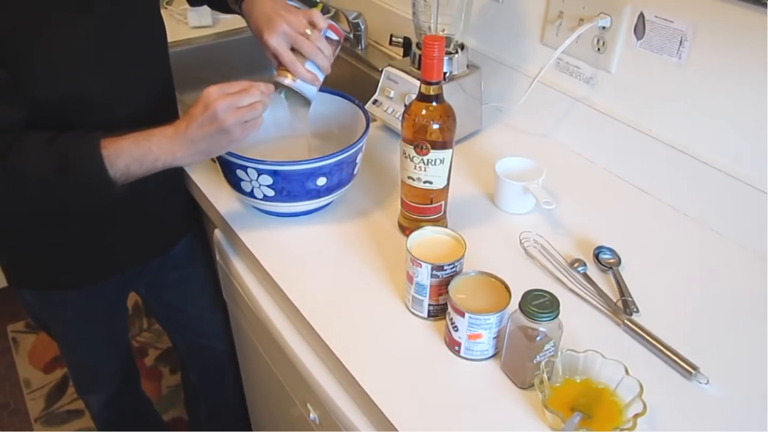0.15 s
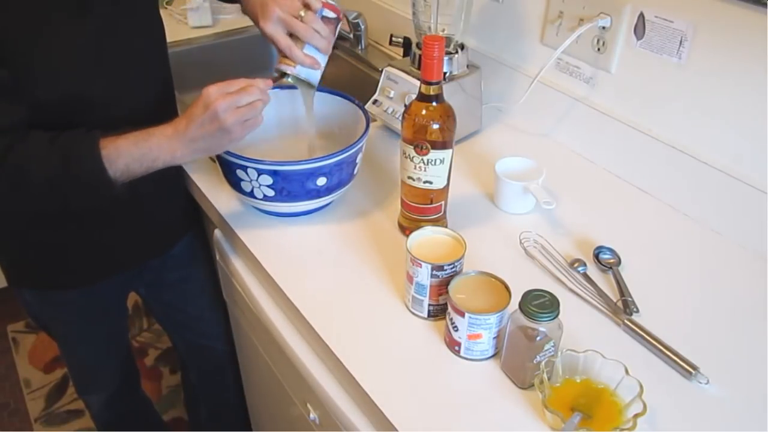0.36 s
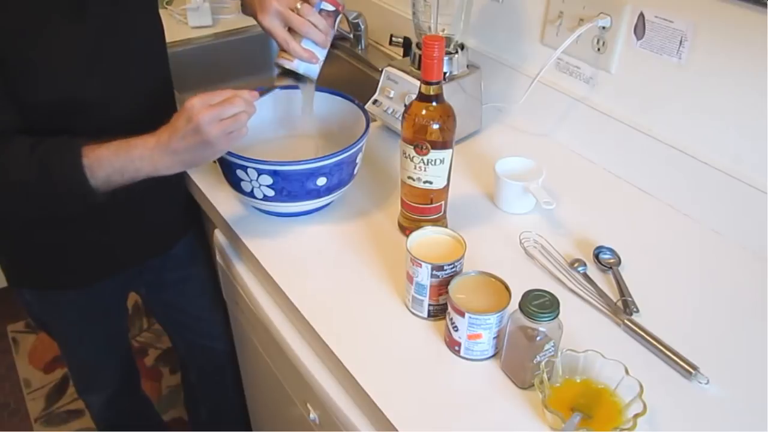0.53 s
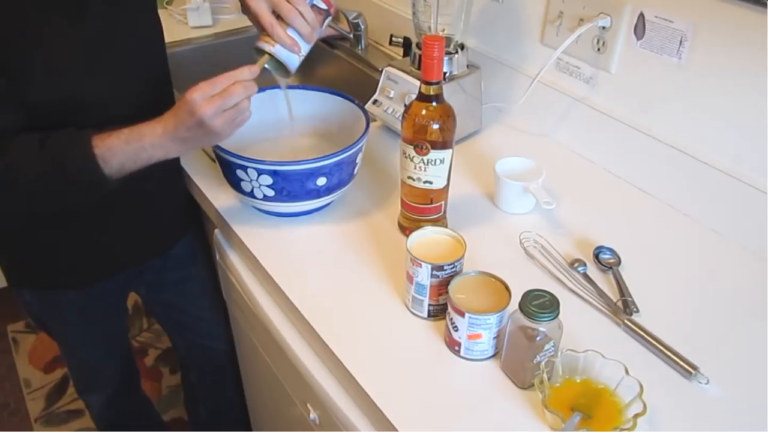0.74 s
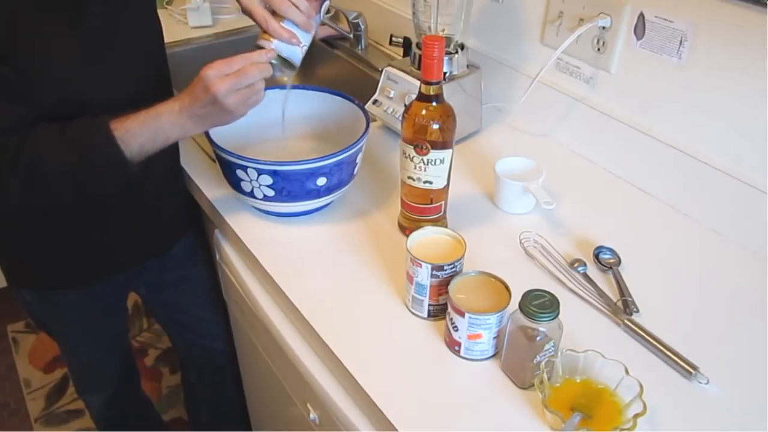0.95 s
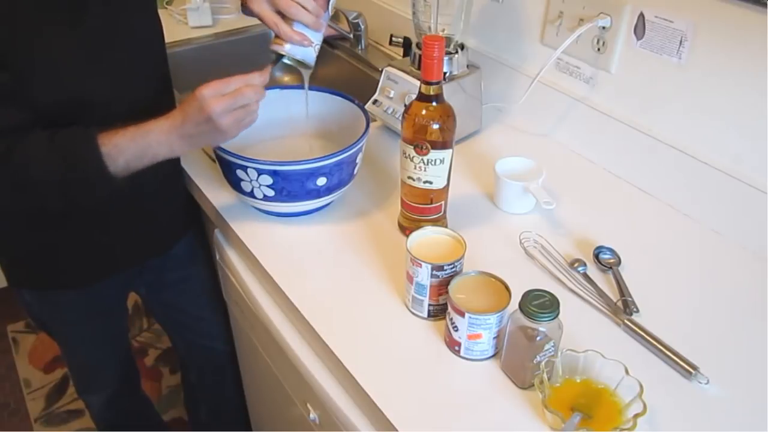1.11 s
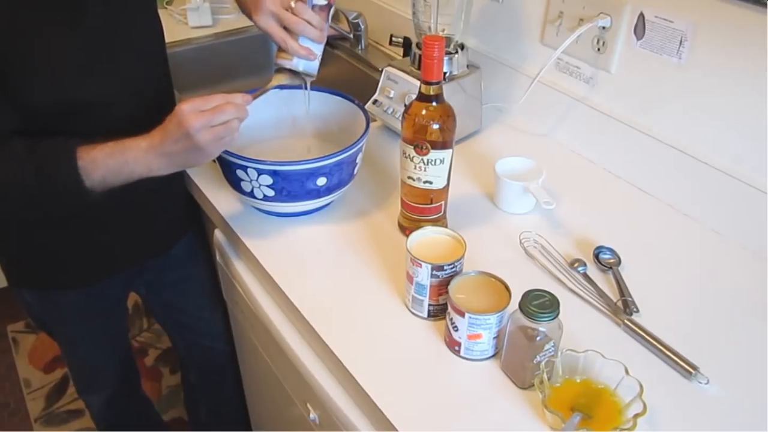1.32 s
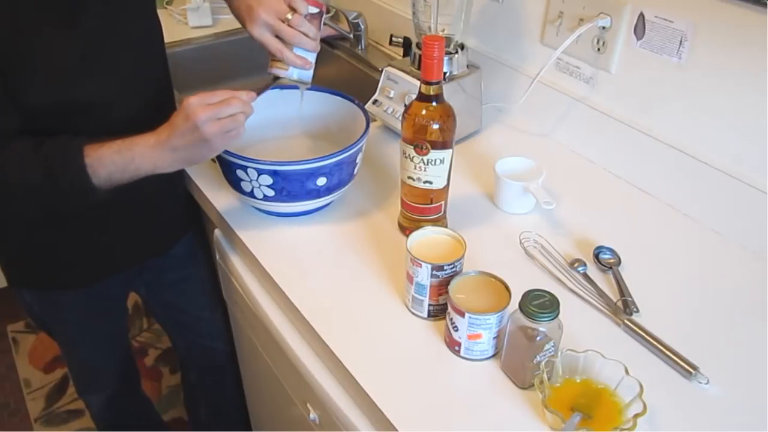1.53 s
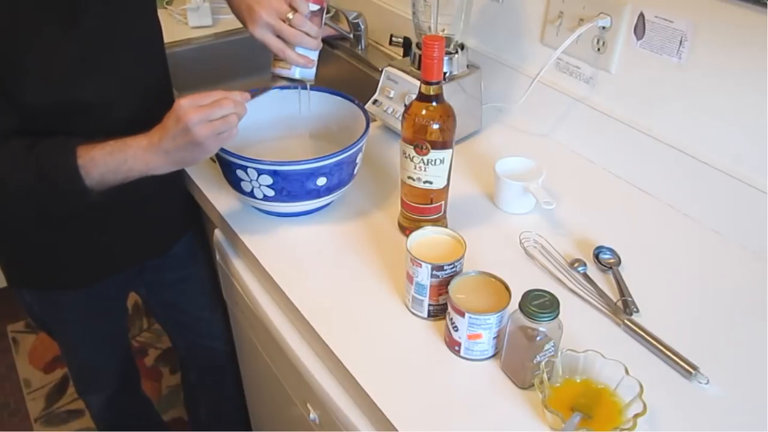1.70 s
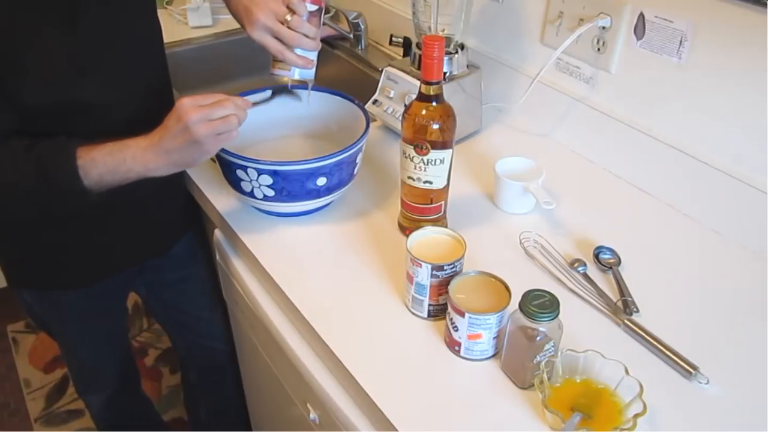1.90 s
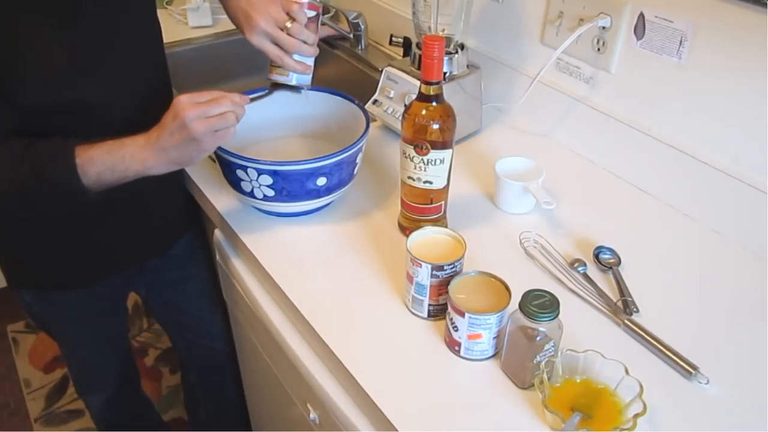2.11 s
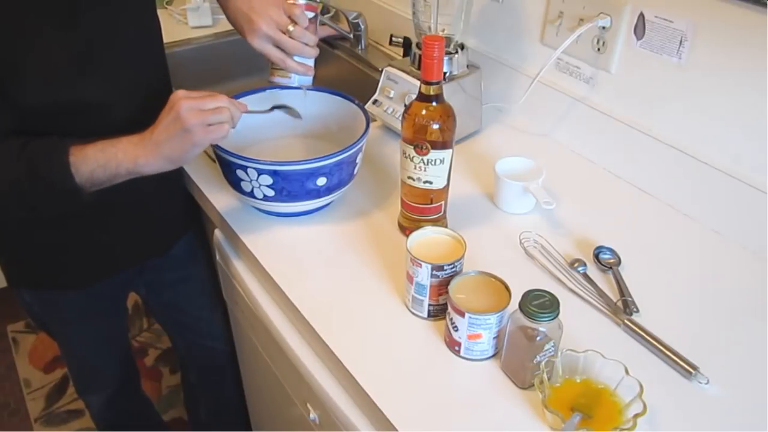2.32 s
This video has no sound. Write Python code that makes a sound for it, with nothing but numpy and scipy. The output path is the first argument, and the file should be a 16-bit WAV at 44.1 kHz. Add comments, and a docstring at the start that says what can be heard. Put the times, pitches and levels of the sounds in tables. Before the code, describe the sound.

Spoon scraping out a can of thick cream: quick rasps and taps first, soft plops, a brief metallic squeal, then louder tinny clanks with short scrapes, over faint room hum and slight kitchen reverberation.

```python
"""A small kitchen hums faintly, with a thin whine, while a metal spoon empties a hand-held can of thick cream.
First comes a flurry of scrapes and light knocks: stick-slip pulses and noise bursts through the can's resonances.
Around it the cream crackles, plops and drops into a ceramic bowl, as short noise bursts and decaying sines.
Then a drag along the wall sings as an unsteady sine, and harder knocks ring panel, rim and booming bottom.
A few scrapes join those knocks; one last small crackle follows them."""
import sys
import numpy as np
from scipy import signal
from scipy.fft import rfft, irfft
from scipy.io import wavfile

SR = 44100
rng = np.random.default_rng(int(sys.argv[2]) if len(sys.argv) > 2 else 0)


def materialize(psi):
    """Save the field psi as 16-bit PCM at rate SR to the path in sys.argv[1].

    A 1-D psi becomes a single channel; in a 2-D psi each row is a channel.
    """
    bounded = np.clip(np.atleast_2d(psi).T, -1, 1)
    quanta = np.round(bounded * 32767).astype(np.int16)
    wavfile.write(sys.argv[1], SR, quanta)


N = 103635
T = np.arange(N) / SR
SHORT = T[:SR // 4]  # time axis of a single event [s]
BOTTOM_RISE_S, BOTTOM_SAG_S = 0.0036, 0.021


def undb(db):
    """Decibels to gain."""
    return 10 ** (np.asarray(db) / 20)


def unit(x):
    """Scale to rms 1."""
    return x / np.sqrt(np.mean(np.abs(x) ** 2))


def add(out, start, x):
    """Mix x into out at a time in seconds."""
    i = max(int(start * SR), 0)
    out[i:i + len(x)] += x[:N - i]


def fade(t, t60):
    """Exponential decay, down 60 dB after t60 seconds."""
    return np.exp(-np.log(1000) * t / t60)


def noise(t):
    """White noise as long as t."""
    return rng.standard_normal(len(t))


def band(x, hz, width):
    """One resonance, gain 1 at its centre."""
    return signal.lfilter(*signal.iirpeak(hz, hz / width, fs=SR), x)


def butter(x, order, hz, kind):
    """Butterworth filter with a flat passband."""
    return signal.sosfilt(signal.butter(order, hz, kind, fs=SR, output="sos"), x)


def colour(x, points):
    """Minimum-phase filter through (frequency [Hz], gain [dB]) points, built by folding the cepstrum."""
    size = 2048
    hz, db = np.array(points).T
    f = np.maximum(np.arange(size // 2 + 1) * SR / size, 1)
    gain = undb(np.interp(np.log(f), np.log(hz), db))
    cepstrum = irfft(np.log(gain))
    cepstrum[1:size // 2] *= 2
    cepstrum[size // 2 + 1:] = 0
    impulse = irfft(np.exp(rfft(cepstrum)))
    return signal.fftconvolve(x, impulse)[:len(x)]


def ring(hz, t60, rise, sag=0):
    """A mode that swells briefly and dies away, starting sharp by the share sag; rms 1 at its peak."""
    env = (1 - np.exp(-(SHORT / rise) ** 2)) * fade(SHORT, t60)
    pitch = hz * (1 + sag * np.exp(-SHORT / BOTTOM_SAG_S))
    return np.sqrt(2) * env / env.max() * np.sin(2 * np.pi * np.cumsum(pitch) / SR)


def burst(hz, width, t60):
    """A dying burst of noise around one frequency, scaled by the spread of its undamped noise."""
    grains = noise(SHORT)
    steady = band(band(grains, hz, width), hz, width)
    dying = band(band(grains * fade(SHORT, t60), hz, width), hz, width)
    return dying / np.std(steady)


# spectral shape of the room noise: (frequency [Hz], relative level [dB])
NOISE_SHAPE = [(15, -8.5), (25, -13), (44, -16.5), (221, -13), (260, -16), (305, -17), (722, -25),
               (1020, -23), (6730, -34), (7910, -32), (15500, -46)]
NOISE_DB = -55  # rms level of the room noise
# steady hum and whine: (frequency [Hz], rms level [dB])
HUM_AND_WHINE = [(312, -70.5), (1023, -73), (7854, -69.5), (7881, -82.5)]


def background():
    """Soft shaped noise plus steady sines: a faint hum and a thin whine whose close partials beat."""
    out = undb(NOISE_DB) * unit(colour(noise(T), NOISE_SHAPE))
    for hz, db in HUM_AND_WHINE:
        out += undb(db) * np.sqrt(2) * np.sin(2 * np.pi * (hz * T + rng.random()))
    return out


# low resonances of the kitchen: (frequency [Hz], width [Hz], gain over the direct sound [dB])
ROOM_MODES = [(355, 16, -2), (399.2, 9.4, 9), (458, 20, -5.5), (490, 3.1, -4), (537, 30, -1.5),
              (621, 8.2, 1)]
ROOM_T60_S, ROOM_TREBLE_T60_S, ROOM_DELAY_S = 0.35, 0.2, 0.0086
ROOM_DB, ROOM_BASS_DB = -6, -7.5  # reflection gains


def kitchen(x):
    """Diffuse reflections as decaying noise, shorter in the treble, and a few low room resonances."""
    t = T[:SR // 2]
    tail = np.zeros(len(t))
    for edges, t60, db in [((100, 700), ROOM_T60_S, ROOM_BASS_DB), ((700, 6500), ROOM_T60_S, ROOM_DB),
                           ((6500, 17000), ROOM_TREBLE_T60_S, ROOM_DB)]:
        env = fade(t, t60) * (t > ROOM_DELAY_S)
        reflections = noise(t) * env / np.linalg.norm(env)
        tail += undb(db) * butter(reflections, 3, edges, "band")
    modes = sum(undb(db) * band(band(x, hz, 6 * width), hz, width) for hz, width, db in ROOM_MODES)
    return x + signal.fftconvolve(x, tail)[:N] + modes


# sticky cream parting from metal: (time [s], level [dB], centre [Hz], width [Hz])
CRACKLES = [(0.055, -34.5, 5000, 1310), (0.061, -43, 8600, 8000), (0.6275, -46, 5500, 5560),
            (0.641, -48.5, 9400, 6000), (0.7117, -39.5, 7400, 6900), (0.9434, -36.5, 9700, 6040),
            (1.4168, -33, 5560, 8600), (2.133, -56, 12300, 4000)]
# plops in the cream, and at 0.505 s a short ring of the can's rim:
# (time [s], level before the tone/noise blend [dB], pitch [Hz], t60 [s])
PLOPS_AND_RIM = [(0.383, -27.5, 1095, 0.056), (0.394, -35, 960, .05), (0.417, -27, 1460, 0.091),
                 (0.505, -29, 1966, 0.073), (1.4152, -19, 1713, 0.019), (1.423, -28.5, 1424, 0.06)]
# lumps of cream landing in the bowl: (time [s], level [dB], centre [Hz], t60 [s])
LUMPS = [(0.426, -50, 156, 0.16), (0.708, -47.5, 104, 0.27), (1.42, -44, 157, 0.26)]


def cream(crackle_t60=0.047, plop_rise=0.0015, plop_width_hz=260, lump_width_hz=110):
    """Wet noise crackles, ragged decaying plops, one short rim ring made alike, and soft thuds of lumps."""
    out = np.zeros(N)
    for s, db, hz, width in CRACKLES:
        add(out, s, undb(db) * burst(hz, width, crackle_t60))
    for s, db, hz, t60 in PLOPS_AND_RIM:
        ragged_tone = 0.5 * ring(hz, t60, plop_rise) + 0.72 * burst(hz, plop_width_hz, t60)
        add(out, s, undb(db) * ragged_tone)
    for s, db, hz, t60 in LUMPS:
        add(out, s, undb(db) * burst(hz, lump_width_hz, t60))
    return out


# the spoon's edge singing along the wall, before wander and flutter: (time [s], pitch [Hz], peak level [dB])
SQUEAL = [(0.86, 2560, -71), (0.90, 2590, -45.5), (0.951, 2543, -58), (1.021, 2685, -52), (1.07, 2720, -39),
          (1.12, 2734, -45.5), (1.2, 2650, -38)]
SQUEAL_WANDER_HZ, SQUEAL_FLUTTER_DB, SQUEAL_FLUTTER_RATE_HZ = 30, 2.5, 45  # rms depths, centre rate


def squeal():
    """The spoon's edge sings as one sine, its pitch and level shaken by low-frequency noise."""
    times, hz, db = np.array(SQUEAL).T
    wander, flutter = (unit(band(noise(T), SQUEAL_FLUTTER_RATE_HZ, 2 * SQUEAL_FLUTTER_RATE_HZ))
                       for _ in range(2))
    pitch = np.interp(T, times, hz) + SQUEAL_WANDER_HZ * wander
    level_db = np.interp(T, times, db, left=-np.inf, right=-np.inf) + SQUEAL_FLUTTER_DB * flutter
    return undb(level_db) * np.sin(2 * np.pi * np.cumsum(pitch) / SR)


# side panel and rim, broadly higher as the cream runs out: (time [s], panel pitch [Hz], rim pitch [Hz])
CAN_PITCH = [(0.2, 791, 1845), (0.5, 796.5, 1910), (0.9, 841, 1850), (1.37, 856, 1976), (1.8, 873, 1995)]


def can_pitch(s):
    """Panel and rim frequencies at a time, between the table's points."""
    times, panel, rim = np.array(CAN_PITCH).T
    return np.interp(s, times, panel), np.interp(s, times, rim)


PANEL_WIDTH_HZ, PANEL_DB = 29.4, 15.5
RIM_WIDTH_HZ, RIM_DB = 88, -2.5


def contact(force, s, low_db, treble_db):
    """The place and hardness of a contact tilt its spectrum; panel and rim resonate with it."""
    tilted = colour(force, [(1500, low_db), (3000, 0), (5800, 0), (10000, treble_db)])
    panel_hz, rim_hz = can_pitch(s)
    panel = undb(PANEL_DB) * band(tilted, panel_hz, PANEL_WIDTH_HZ)
    rim = undb(RIM_DB) * band(tilted, rim_hz, RIM_WIDTH_HZ)
    return tilted + panel + rim


SLIP_RING_T60_S, SLIP_RING_SHARE = 0.035, 0.5  # share of the power


def slip_ring(x):
    """Every slip rings briefly in the dense upper modes of the spot where the spoon rubs."""
    upper = butter(x, 2, 1600, "high")
    rung = signal.fftconvolve(upper, noise(SHORT) * fade(SHORT, SLIP_RING_T60_S))[:len(x)]
    return np.sqrt(1 - SLIP_RING_SHARE) * unit(x) + np.sqrt(SLIP_RING_SHARE) * unit(rung)


# spoon dragged along the wall: (start [s], attack [s], hold [s], release [s], rasp drive before makeup [dB],
# low-mid colour [dB], treble colour [dB], bottom level [dB], bottom pitch [Hz])
SCRAPES = [(0.0, 0.001, 0.033, 0.017, -50, 10, -13, -33, 597),
           (0.116, 0.0024, 0.13, 0.0072, -38.5, -5.5, -11.5, -64, 572),
           (0.362, 0.0083, 0.054, 0.011, -42.5, 6, -6, -43.5, 511),
           (0.411, 0.016, 0.036, 0.0253, -30, 4, -3, -16.5, 529.2),
           (0.785, 0.063, 0.067, 0.018, -40.5, 4, -0.5, -39.5, 597),
           (1.002, 0.0066, 0.13, 0.015, -43.5, 0.5, -4.5, -50, 570),
           (1.099, 0.034, 0.034, 0.016, -33, 8.5, 2, -26, 563.7),
           (1.176, 0.005, 0.021, 0.023, -35.5, -8, -3, -25, 571.6),
           (1.566, 0.0135, 0.013, 0.0083, -28, -2.5, 0, -19, 551),
           (1.785, 0.004, 0.028, 0.037, -29, -2.5, -12.5, -43, 548),
           (1.893, 0.018, 0.0094, 0.017, -36.5, 2.5, 0, -38.5, 548)]
# slips coarser the harder the spoon presses: (rasp drive [dB], scatter of the slips [dB], hiss gain [ratio])
GRIT = [(-42, 3, 1.1), (-28, 6, .5)]
SLIPS_PER_S, JUDDER_HZ, JUDDER_DB = 800, 119, 2
BOTTOM_WIDTH_HZ, BOTTOM_STEADY = 50.2, 0.87  # steadiness 1 would flatten the groan's level entirely


def scrapes():
    """Uneven stick-slip pulses rasp on the wall and keep the bottom groaning; returns wall drive and tones."""
    wall, tones = np.zeros(N), np.zeros(N)
    grit_db, grit_scatter, grit_hiss = np.array(GRIT).T
    for s, attack, hold, release, db, low_db, treble_db, bottom_db, hz in SCRAPES:
        pressure = np.interp(SHORT, np.cumsum([0, attack, hold, release]), [0, 1, 1, 0])
        judder = undb(JUDDER_DB * unit(band(noise(SHORT), JUDDER_HZ, JUDDER_HZ)))
        scatter_db = np.interp(db, grit_db, grit_scatter)
        hiss = np.interp(db, grit_db, grit_hiss)
        happens = rng.random(len(SHORT)) < SLIPS_PER_S / SR
        slips = happens * undb(scatter_db * np.clip(noise(SHORT), -2, 2))
        pulses = unit(slips * np.sign(noise(SHORT)))  # either direction at random
        rasp = unit(judder * (pulses + hiss * noise(SHORT)))
        add(wall, s, undb(db + 4.5) * pressure * contact(slip_ring(rasp), s, low_db, treble_db))

        resonance = band(band(noise(SHORT), hz, BOTTOM_WIDTH_HZ), hz, BOTTOM_WIDTH_HZ)
        swing = signal.hilbert(resonance)[::-1]  # reversed, so it starts already swinging
        groan = unit((swing / (np.abs(swing) + 1e-12) ** BOTTOM_STEADY).real)
        add(tones, s, undb(bottom_db) * pressure * unit(groan * judder ** 0.36))
    return wall, tones


# spoon on can: (time [s], clack drive before makeup [dB], low-mid colour [dB], treble colour [dB],
# bottom level [dB], bottom pitch [Hz], rim level before halving [dB])
KNOCKS = [(0.0744, -31, -9, -7, -31.5, 485, -48), (0.1933, -27, 2.5, 0.5, -24, 573, -58),
          (0.2016, -28, 5, 4, -18.5, 548, -57), (0.2236, -32, 4, -6, -23, 560, -44),
          (0.2698, -34, 7.5, -4, -35.5, 543, -41), (0.3545, -39, 12, -4, -31, 520, -51),
          (0.393, -30.5, 7, 2, -31, 560, -61), (0.4074, -23.5, 7.5, -11, -15, 560.5, -42),
          (0.503, -33, 6, 7, -49, 526, -47), (0.6804, -36, -1.5, -7, -41, 549, -45),
          (0.7827, -47, 10.5, -2, -42.5, 453, -67), (1.0975, -43, 10, 8, -25, 594, -53),
          (1.3696, -17.5, 0.5, -13, -15.5, 577, -17), (1.5213, -17.5, -1, 0.5, -16, 557, -24.5),
          (1.562, -23.5, 4, 0, -20, 521, -36), (1.7639, -21.5, -6, -9, -18, 556, -30),
          (1.8211, -29, -5, 2, -21, 537.5, -34), (1.9044, -37.5, -4, 7, -30.5, 545, -42)]
CLACK_T60_S, BOTTOM_T60_S, BOTTOM_LAG_S = 0.065, 0.044, 0.0015
BOTTOM_SAG = 0.021  # share by which the boom starts sharp
THUNK_HZ, THUNK_WIDTH_HZ, THUNK_T60_S, THUNK_DB = 490, 570, 0.065, -22.5  # level relative to the boom
PANEL_RING_DB, PANEL_T60_S = -14, 0.33  # level relative to the clack drive
RIM_T60_S, RIM_BUZZ_WIDTH_HZ = 0.13, 50


def knocks():
    """Each knock rattles the wall, booms the bottom and rings panel and rim; returns wall drive and tones."""
    wall, tones = np.zeros(N), np.zeros(N)
    for s, db, low_db, treble_db, bottom_db, hz, rim_db in KNOCKS:
        panel_hz, rim_hz = can_pitch(s)
        clack = noise(SHORT) * fade(SHORT, CLACK_T60_S)
        add(wall, s, undb(db + 3.5) * contact(clack, s, low_db, treble_db))
        boom = ring(hz, BOTTOM_T60_S, BOTTOM_RISE_S, BOTTOM_SAG)
        thunk = undb(THUNK_DB) * burst(THUNK_HZ, THUNK_WIDTH_HZ, THUNK_T60_S)
        add(tones, s + BOTTOM_LAG_S, undb(bottom_db) * (boom + thunk))
        add(tones, s, undb(db + PANEL_RING_DB) * ring(panel_hz, PANEL_T60_S, BOTTOM_RISE_S))
        rim = ring(rim_hz, RIM_T60_S, BOTTOM_RISE_S) + burst(rim_hz, RIM_BUZZ_WIDTH_HZ, RIM_T60_S)
        add(tones, s, undb(rim_db) * rim / 2)
    return wall, tones


# dense rattle of the wall: (frequency [Hz], gain [dB])
RATTLE = [(50, -66), (130, -18.5), (250, -8), (450, 6.5), (700, 0.5), (1100, -1.5), (1800, 2), (2250, -2),
          (3200, 0), (4900, -3.5), (6500, 0.5), (9000, -4.5), (12000, -8), (15500, -19.5)]
# resonances of can wall and spoon: (frequency [Hz], width [Hz], gain over the dense rattle [dB])
WALL = [(1006, 6.6, -9.5), (1020, 16, -7.5), (1110, 7.5, -3.5), (1403, 20, 4), (1663, 11, -46),
        (2530, 47, 3), (2720, 25, 7), (2956, 30, -10.5), (3300, 26, -4.5), (3690, 460, 0.5),
        (4450, 290, -5.5), (5790, 19, -3), (6060, 75, -4.5), (6950, 59, -22), (7680, 140, -5.5),
        (9800, 180, -5)]
TONES_ABOVE_HZ = 220


def can():
    """Knocks and scrapes sound through the resonances of the wall; the can's tones keep no deep bass."""
    drive, tones = np.array(knocks()) + np.array(scrapes())
    rattle = colour(drive, RATTLE)
    resonances = sum(undb(db) * band(rattle, hz, width) for hz, width, db in WALL)
    return rattle + resonances + butter(tones, 2, TONES_ABOVE_HZ, "high") + squeal()


def scene():
    """Can and cream reverberate in the kitchen over its steady background."""
    return (kitchen(can() + cream()) + background())[None]


TOP_HZ = 15700


def record(dry):
    """The recorder cuts the top with a steep elliptic low-pass."""
    return signal.sosfilt(signal.ellip(10, 0.2, 80, TOP_HZ, fs=SR, output="sos"), dry)


dry = scene()
out = record(dry)
materialize(out)
```